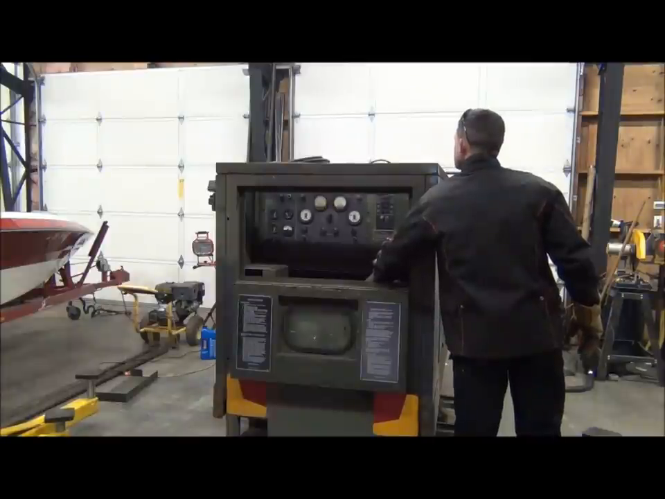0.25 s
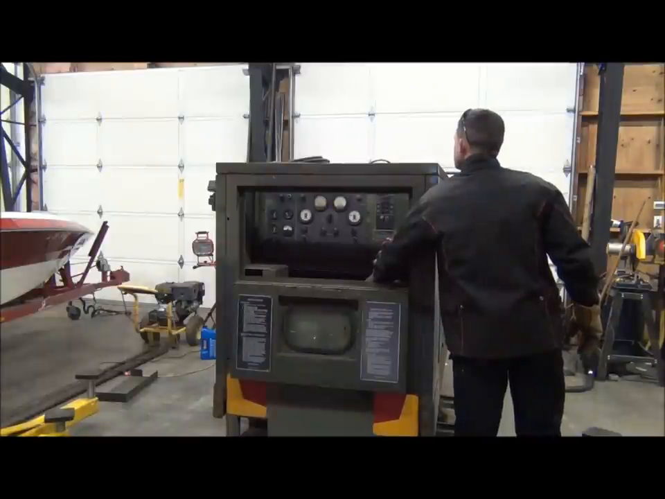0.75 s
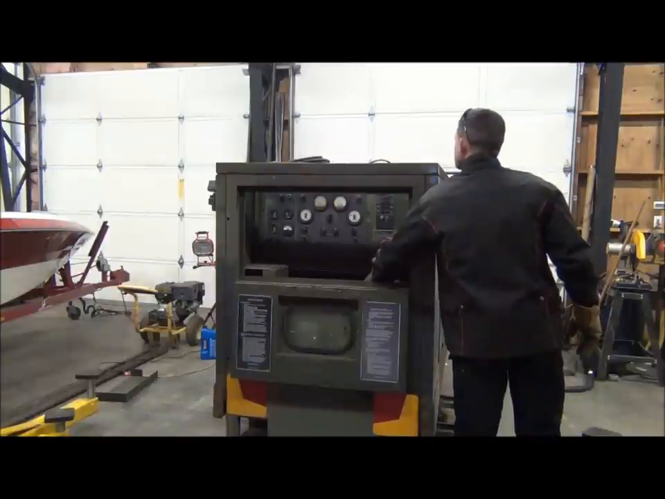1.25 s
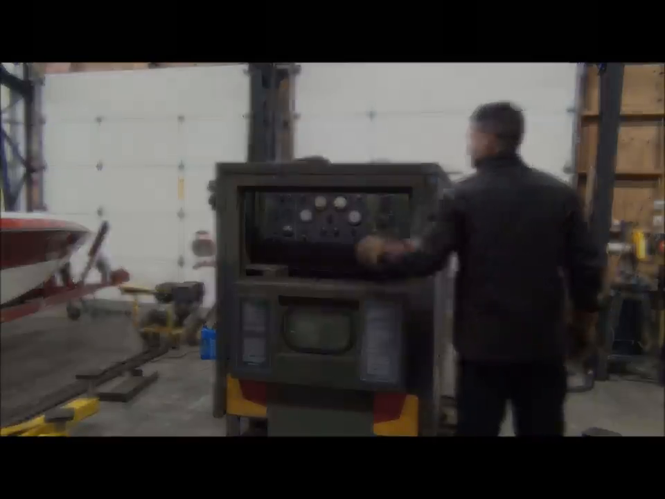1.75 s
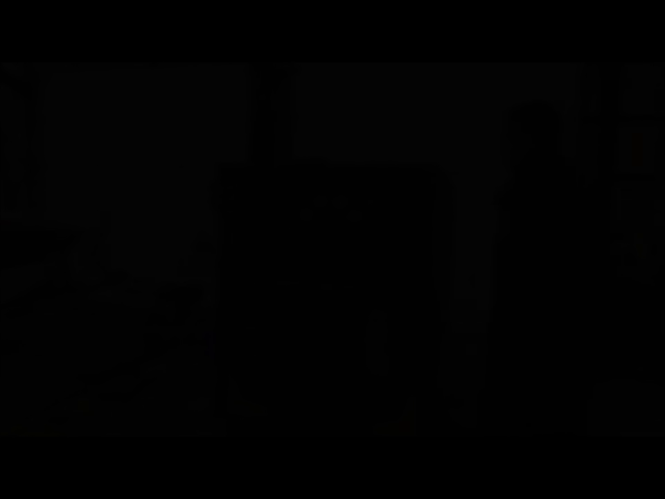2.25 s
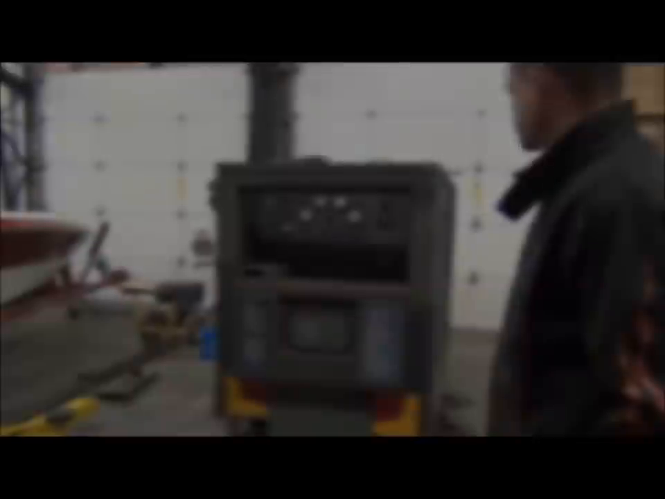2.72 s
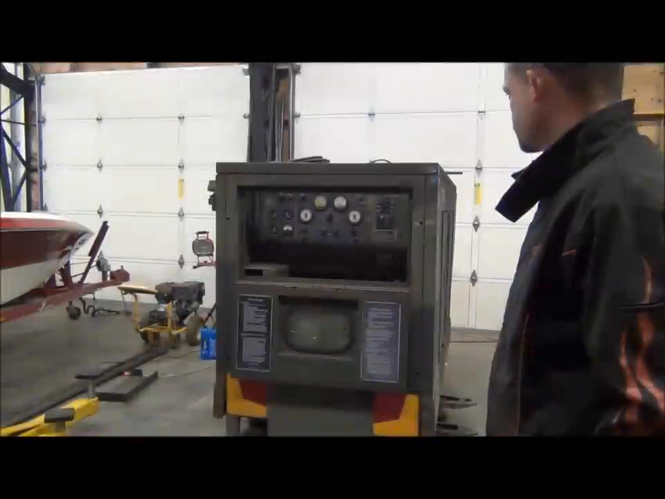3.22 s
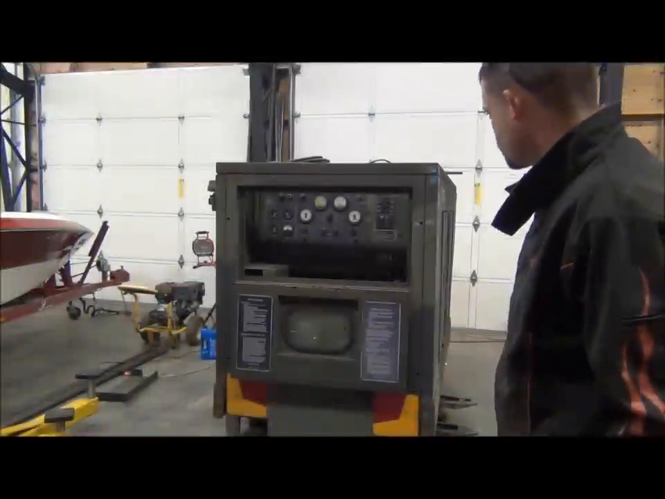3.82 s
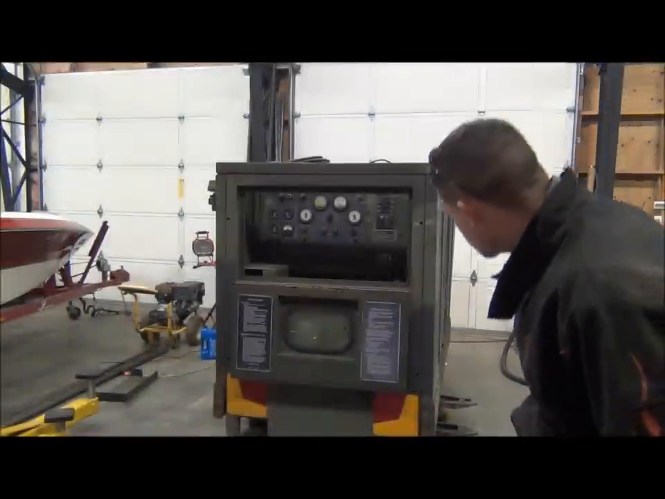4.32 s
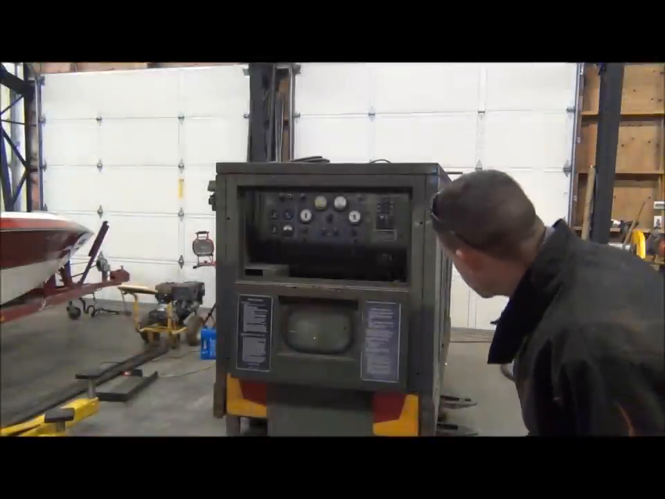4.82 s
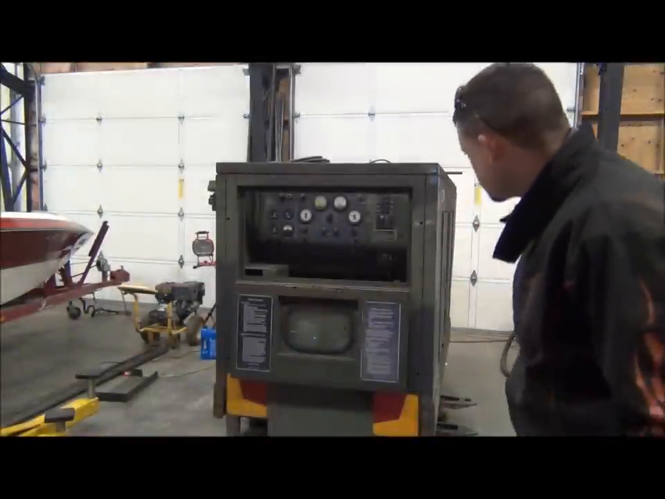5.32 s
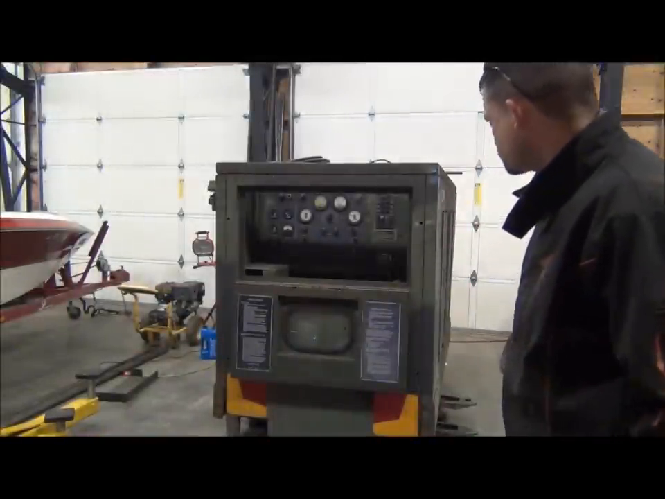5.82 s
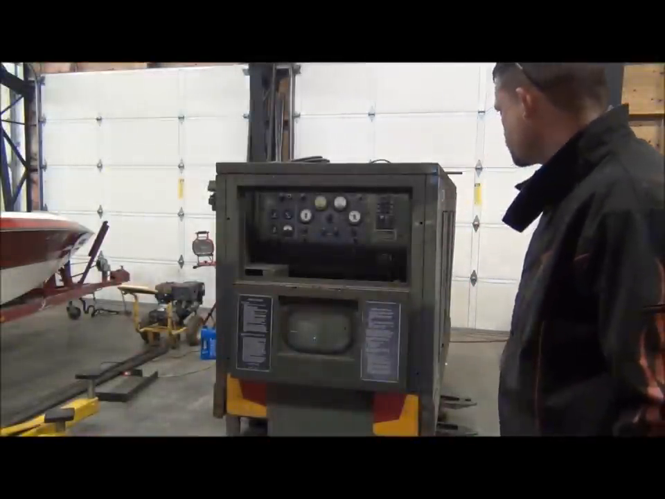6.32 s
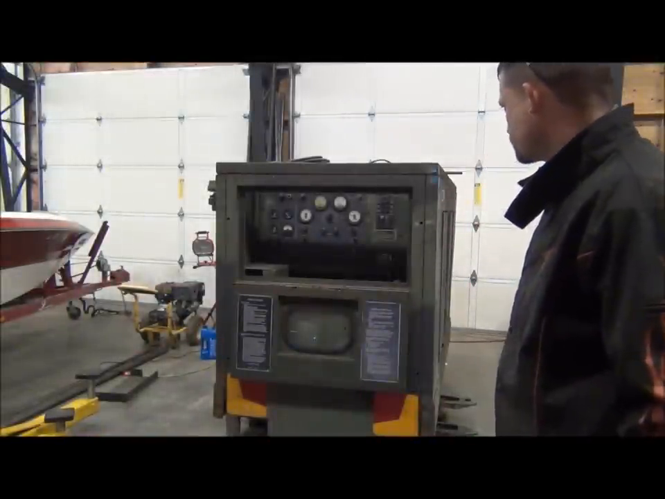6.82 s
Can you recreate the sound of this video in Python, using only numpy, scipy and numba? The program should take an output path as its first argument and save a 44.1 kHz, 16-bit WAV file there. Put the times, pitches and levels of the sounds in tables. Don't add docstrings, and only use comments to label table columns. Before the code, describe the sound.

A four-cylinder diesel generator runs close by in a workshop from the first instant. Its deep exhaust throb beats against a low fan drone, with air roaring through the grille and dull knocks ringing the steel housing. It gains slightly in speed at first, fades into a steadier stretch around two seconds with a brief drop in level, then holds strong. Close stereo pickup pumps with the beat.

```python
import sys
import numpy as np
from scipy import signal
from scipy.fft import rfft, irfft, next_fast_len
from scipy.io import wavfile
from scipy.ndimage import uniform_filter1d, map_coordinates
from numba import njit

SR = 44100
rng = np.random.default_rng(int(sys.argv[2]) if len(sys.argv) > 2 else 0)


def amplitude_ratio(level_db):
    exponent = np.asarray(level_db, float) / 20
    return 10 ** exponent


def bounce(signal):
    frames = np.transpose(np.atleast_2d(signal))
    limited = np.clip(frames, -1, 1)
    pcm = np.round(limited * 32767).astype(np.int16)
    wavfile.write(sys.argv[1], SR, pcm)


N = 311346


def unit(x):
    return x / np.sqrt(np.mean(x ** 2) + 1e-20)


def along(points, hz):
    f, value = np.transpose(points)
    return np.interp(np.log(hz + 1), np.log(f + 1), value)


def wobble(rate):
    knots = rng.standard_normal(int(N * 40 / SR) + 4)
    return map_coordinates(knots, [np.arange(N) * rate / SR])


def ramp(one_s, zero_s):
    return np.clip((np.arange(N) / SR - zero_s) / (one_s - zero_s), 0, 1)


# f/Hz, correlation [0-1]
ALIKE = [(60, .96), (150, .96), (300, .94), (450, .9), (950, .85), (2380, .84), (5980, .84), (10000, .89),
         (15000, .92)]
# f/Hz, phase [rad]
LEAD = [(50, -.2), (100, -.39), (160, -.5), (230, -.62), (430, -.58), (1290, -.2), (4480, -.1), (15000, 0)]
# f/Hz, level/dB
TILT = [(60, .9), (150, 1.3), (380, 1.3), (950, .4), (2400, .5), (6000, .1), (15000, 0)]


def spread(pair, gain):
    size = next_fast_len(N + 8192)
    hz = np.fft.rfftfreq(size, 1 / SR)
    turn = np.arccos(np.clip(along(ALIKE, hz), -1, 1)) / 2
    common, apart = rfft(pair, size) * gain(hz) * [np.cos(turn), np.sin(turn)]
    skew = amplitude_ratio(along(TILT, hz) / 2) * np.exp(.5j * along(LEAD, hz))
    ports = np.array([(common + apart) * skew, (common - apart) / skew])
    return irfft(ports, size)[:, :N]


# f/Hz, level/dB
TIP = [(100, .9), (152, .2), (168, 1.7), (227, 2.5), (253, 2), (336, .3), (1000, .5)]


def tone(turns, hz, db, unsteady_db):
    side = np.array([[.5], [-.5]])
    swing = amplitude_ratio(db + 4.5 + unsteady_db * wobble(6))
    balance = amplitude_ratio(side * along(TIP, hz))
    return swing * balance * np.cos(2 * np.pi * turns + side * along(LEAD, hz))


# multiple of shaft speed, early level/dB, late level/dB, gain under load/dB
ORDERS_LOW = [(2, -39.5, -39, -1), (3, -45, -44.5, 4), (4, -30, -29, -2), (5, -53, -70, -7),
              (6, -24, -22.5, -5), (7, -47, -44, -12), (8, -33, -72, 7), (9, -28, -27.5, -2),
              (10, -36, -34, -7), (11, -35.5, -36.5, -6), (12, -44, -37.5, 10)]
ORDERS_HIGH = [(14, -46, -41, 0), (16, -43, -44, 2), (17.5, -42, -48, 2), (20, -40, -45, 2),
               (21.5, -44, -46, 2), (26, -44, -42, 2), (29, -50, -44, 2), (41.5, -44, -49, 2),
               (45, -48, -44, 2), (47.5, -49, -45, 2), (49.5, -45, -42, 2), (51.5, -43, -50, 2),
               (55.5, -47, -45, 2), (81, -60, -48, 0), (89, -55, -51, 0), (92, -54, -50, 0),
               (99, -58, -52, 0), (108.5, -58, -52, 0), (116, -58, -55, 0)]
# f/Hz, level/dB per Hz
RUMBLE = [(20, -29), (50, -12), (90, -11), (125, 1), (155, 4.5), (260, -2.5), (450, -19), (3000, -120)]


def exhaust(shaft, load, late, start):
    lines = 0
    for (multiple, early_db, late_db, load_db), angle in zip(ORDERS_LOW + ORDERS_HIGH, start):
        twist = .0012 * multiple * wobble(10)
        turns = multiple * shaft + angle + twist
        hz = multiple * shaft[-1] * SR / N
        db = [early_db, late_db][late] + load_db * load
        lines = lines + tone(turns, hz, db, unsteady_db=min(.15 + .06 * multiple, 2.5))
    flutter = unit(spread(rng.standard_normal((2, N)), lambda hz: amplitude_ratio(along(RUMBLE, hz))))
    flutter_db = -28 + 2.4 * load + 1.1 * wobble(3.4)
    return lines + amplitude_ratio(flutter_db) * flutter


FAN = [
    (6.64384, .011),
    (6.64570, .2018),
]
# multiple, early level/dB, late level/dB
BLADES = [(1, -23, -22), (2, -46, -42), (3, -48, -47), (7, -46, -40)]
# f/Hz, level/dB per Hz
AIR = [(1760, -3), (3000, -5.5), (3840, -9.5), (6140, -5), (7390, -7.5), (11200, -7), (13000, -12),
       (15700, -18.5)]


def fan(shaft, late, sixth):
    ratio, angle = FAN[late]
    slip = .02 * wobble(2) + .008 * wobble(12)
    turns = ratio * shaft + angle + sixth + slip
    blades = 0
    for multiple, *levels in BLADES:
        unsteady_db = .2 + .35 * multiple
        blades = blades + tone(multiple * turns, multiple * 168, levels[late], unsteady_db)
    air = unit(spread(rng.standard_normal((2, N)), lambda hz: amplitude_ratio(along(AIR, hz))))
    shake_db = .6 * np.cos(4 * np.pi * shaft + .3)
    draught_db = .7 * wobble(9) + .2 * wobble(4)
    return blades + amplitude_ratio([-31.3, -31][late] + shake_db + draught_db) * air


# f/Hz, level/dB per Hz
KNOCK_EARLY = [(180, -38), (300, -7), (469, 0), (504, 0.5), (580, -3.5), (751, -6.5), (1190, -4.5),
               (1580, -8), (2380, -11), (2780, -15), (5000, -27), (6500, -44), (11000, -120)]
# f/Hz, level/dB per Hz
KNOCK_LATE = [(180, -55), (300, -17.5), (410, -4.5), (520, -5.5), (590, -10), (650, -6.5), (800, -9),
              (1080, -7.5), (1190, -6), (1330, -11), (1540, -12), (2300, -13), (5000, -27), (9000, -120)]
# f/Hz, power share [0-1]
REPEATS = [(300, .55), (1300, .6), (2500, .45), (5000, .15)]
CYCLE = 4096


def knocks(shaft, late):
    spectrum = [KNOCK_EARLY, KNOCK_LATE][late]
    place = (shaft / 2 % 1) * CYCLE
    cylinder = (place * 4 // CYCLE).astype(int) % 4
    strength = amplitude_ratio(0.86 * rng.standard_normal(4))[cylinder]
    blow = unit(1 + .35 * strength * np.exp(-2.5 * (2 * shaft % 1)))
    pattern = unit(rng.standard_normal((2, CYCLE)))[:, place.astype(int) % CYCLE]

    def same_gain(hz):
        return amplitude_ratio(along(spectrum, hz)) * np.sqrt(along(REPEATS, hz))

    def new_gain(hz):
        return amplitude_ratio(along(spectrum, hz)) * np.sqrt(1 - along(REPEATS, hz))

    same = spread(blow * pattern, same_gain)
    new = spread(blow * rng.standard_normal((2, N)), new_gain)
    return unit(same + new) * amplitude_ratio(0.13 * wobble(7))


@njit
def follow(level, rise, fall):
    out = np.empty_like(level)
    held = level[:2000].max()
    for i in range(len(level)):
        held += (level[i] - held) * (rise if level[i] > held else fall)
        out[i] = held
    return out


def gain_control(x, squeeze, attack_s, release_s):
    held = follow(np.abs(x).max(0), 1 / (1 + attack_s * SR), 1 / (1 + release_s * SR))
    gain = uniform_filter1d(uniform_filter1d(held ** -squeeze, size=5), size=4)
    return x * gain / gain.mean()


GOVERNED = [25.314, 25.295]
SHORTFALL, CATCH_UP_S = .5, .495
FUEL_HELD_S, FUEL_CUT_S, FUEL_KNOCK_DB = 0.16, 0.7, 2.7
# full gain, full at t/s, silent at t/s
FADES = [
    (1.0, 0.76, 3.25),
    (1.0, 4.0, 1.72),
]


def stretch(late, start):
    lagging = (1 - late) * SHORTFALL * np.exp(-np.arange(N) / SR / CATCH_UP_S)
    shaft = np.cumsum(GOVERNED[late] - lagging) / SR
    load = (1 - late) * ramp(FUEL_HELD_S, FUEL_HELD_S + FUEL_CUT_S)
    sound = exhaust(shaft, load, late, start) + fan(shaft, late, sixth=start[4])
    knock_db = [-24.6, -25.1][late] + FUEL_KNOCK_DB * load
    sound += amplitude_ratio(knock_db) * knocks(shaft + .1, late)
    full, full_s, silent_s = FADES[late]
    pumped = gain_control(sound, squeeze=0.67, attack_s=0.00048, release_s=0.012)
    return full * ramp(full_s, silent_s) * pumped


SHAFT_LEAD = .203


def scene():
    order = np.array([row[0] for row in ORDERS_LOW])
    pulse = .38 * (order > 6.5)
    late = np.r_[pulse, rng.random(len(ORDERS_HIGH))]
    early = np.r_[pulse - order * SHAFT_LEAD, rng.random(len(ORDERS_HIGH))]
    return stretch(0, early) + stretch(1, late)


def top_cut(x):
    return signal.sosfilt(signal.butter(12, 15725, fs=SR, output="sos"), x)


def record(dry):
    return top_cut(dry)


dry = scene()
out = record(dry)
bounce(out)
```